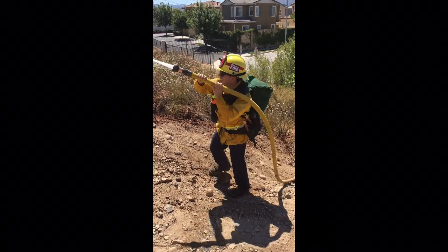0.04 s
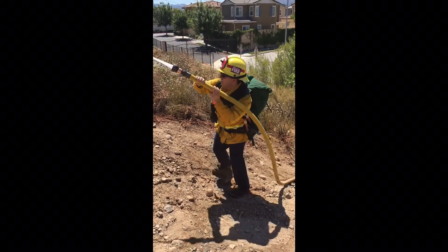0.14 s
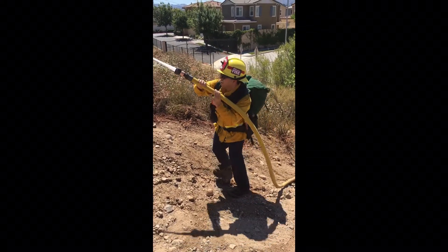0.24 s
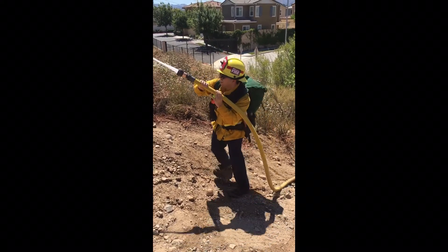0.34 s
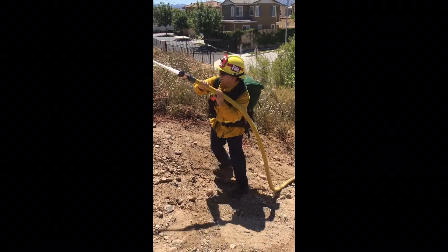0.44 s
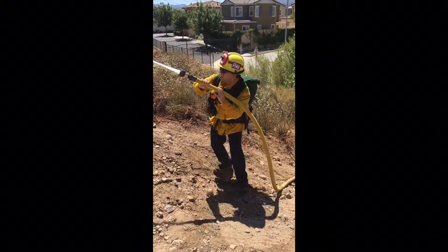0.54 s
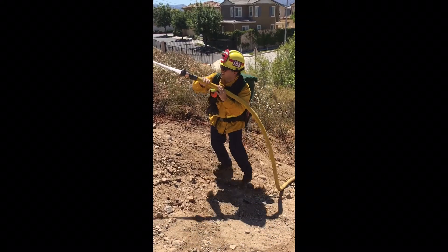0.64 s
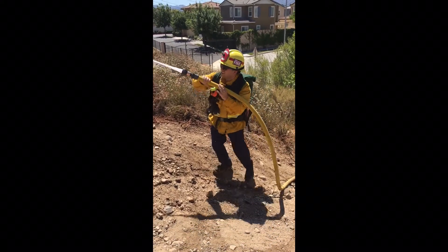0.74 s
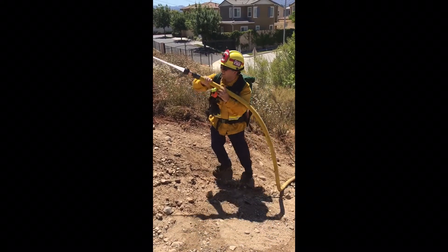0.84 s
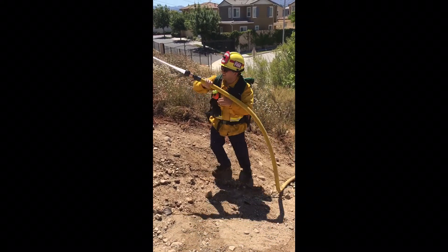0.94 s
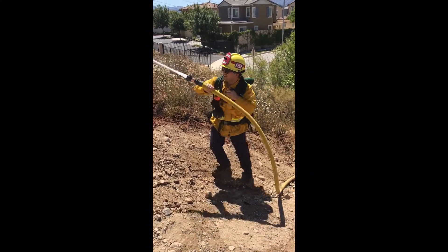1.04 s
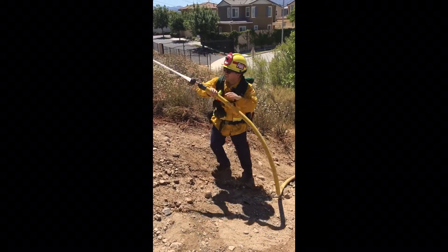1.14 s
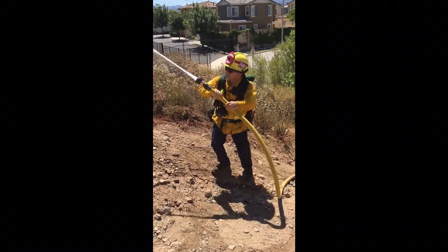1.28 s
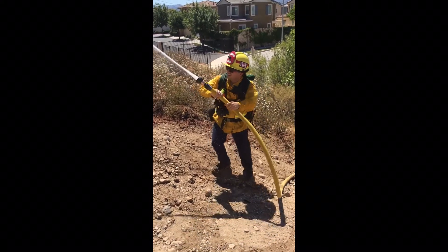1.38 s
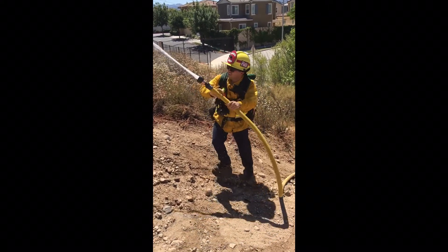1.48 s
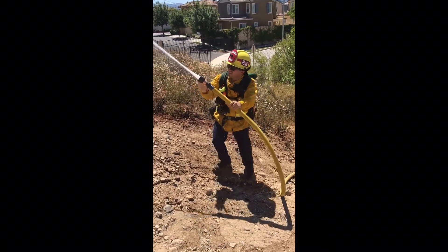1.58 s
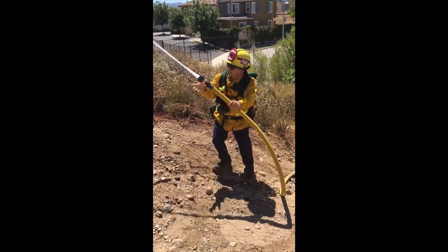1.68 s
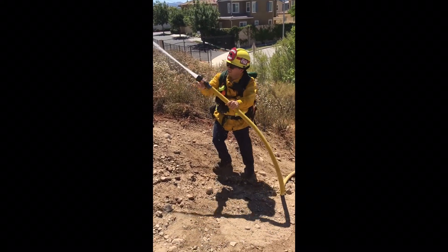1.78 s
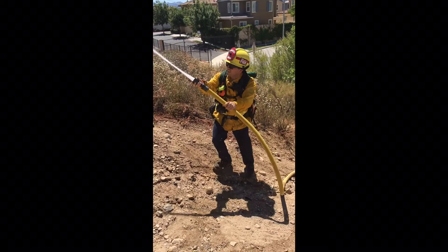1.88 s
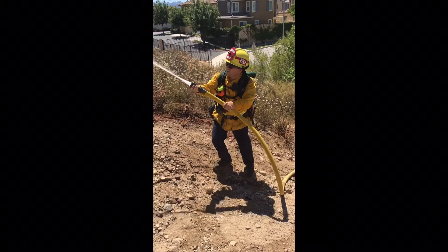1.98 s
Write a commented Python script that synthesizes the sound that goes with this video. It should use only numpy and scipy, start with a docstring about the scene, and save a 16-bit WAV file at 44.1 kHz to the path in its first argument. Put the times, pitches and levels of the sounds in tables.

```python
"""A hose nozzle sprays over a dry slope: shaped noise rushes and hisses, random drops spatter in it, and the
level heard dips briefly after the clink. Low noise makes a little wind rumble; bright noise bursts tick as gear.
A metal fitting clinks once and bounces twice: noise cracks over a bright ring of beating sines, with echoes
and faint later tinkles. Soft low thumps come next, and a boot scuffs and lands on stony dirt with short
sine knocks and noise grit. The sound is mono, alike in both channels."""
import sys
import numpy as np
from scipy import signal
from scipy.fft import rfft, irfft
from scipy.io import wavfile
from scipy.ndimage import map_coordinates

SR = 44100
rng = np.random.default_rng(int(sys.argv[2]) if len(sys.argv) > 2 else 0)


def log_audio(samples):
    """Write samples as a 16-bit WAV file to the path given in sys.argv[1]."""
    # one column per channel
    frames = np.atleast_2d(samples).T
    # limit to full scale, then quantise
    limited = np.clip(frames, -1, 1)
    pcm = np.round(limited * 32767).astype(np.int16)
    wavfile.write(sys.argv[1], SR, pcm)


N = 88200  # 2 s
T = np.arange(N) / SR
HZ = np.maximum(np.arange(N // 2 + 1) * SR / N, 1)


def from_db(db):
    """Decibels to gain."""
    return 10 ** (np.asarray(db) / 20)


def rms_one(x):
    """Scale to rms 1."""
    return x / np.sqrt(np.mean(x ** 2) + 1e-20)


def colour(x, spectrum, peaks=()):
    """Filter by a spectrum with resonances on top, rolling off below its lowest point; rms 1."""
    hz, db = np.transpose(spectrum)
    curve = np.interp(np.log(HZ), np.log(hz), db)
    for centre_hz, width_hz, lift_db in peaks:
        curve = curve + lift_db / (1 + (2 * (HZ - centre_hz) / width_hz) ** 2)
    low_cut = HZ ** 2 / (HZ ** 2 + (hz[0] / 2) ** 2)
    return rms_one(irfft(rfft(x) * from_db(curve) * low_cut, N))


def noise(spectrum, peaks=()):
    """Coloured noise of rms 1."""
    return colour(rng.standard_normal(N), spectrum, peaks)


def drift(rate_hz):
    """Slow random wander of rms 1: noise that falls away above the rate."""
    return rms_one(irfft(rfft(rng.standard_normal(N)) / (1 + (HZ / rate_hz) ** 2), N))


def decay(start_s, t60_s):
    """A sudden start that dies away by 60 dB in t60."""
    return (T >= start_s) * from_db(-60 * np.clip((T - start_s) / t60_s, 0, 2))


def spray():
    """The jet rushes through resonances, its mist hisses, and drops patter within the hiss."""
    # level of the spray as heard, dipping briefly after the clink: start_s, rush_level_db, hiss_level_db
    heard_levels = [(0, -39.5, -44.5), (.18, -40.5, -43.3), (.33, -44, -46.5), (.39, -43.5, -47.5),
                    (.45, -40.5, -43.5), (.62, -42.5, -44.5), (.8, -42, -44.5), (1.05, -43, -46),
                    (1.32, -42, -45), (1.6, -42.5, -44.6), (2, -43, -44.5)]
    # rush of the jet: freq_hz, level_db (per Hz, relative)
    rush_spectrum = [(130, -3.5), (250, 1), (430, -8.5), (650, -0.5), (900, -4.5), (1400, -1.5),
                     (2800, -4.5), (3400, -7), (4200, -6), (5000, -13.5), (8000, -21.5)]
    # resonances that colour the rush: freq_hz, width_hz, lift_db
    rush_peaks = [(1048, 99, 5.5), (1134, 42, 3.5), (1211, 76, 6.5), (1664, 39, 8), (1878, 52, 7),
                  (2307, 120, 6), (2485, 72, 5.5), (2820, 64, 3.5), (2990, 110, 7.5), (3510, 40, 6.5)]
    # hiss of the mist: freq_hz, level_db (per Hz, relative)
    hiss_spectrum = [(3000, -19), (5200, -5), (6400, 2), (7050, 1), (7900, -4), (8500, -2.5), (9100, 1),
                     (9900, 2), (10300, -4), (11000, -1.5), (12000, -5), (13200, -3.5), (15500, -5.5)]
    drops_per_s, drop_spread_db = 1500, 7
    drops_db = -13  # relative to the hiss

    s, rush_db, hiss_db = np.transpose(heard_levels)
    rush_level = from_db(np.interp(T, s, rush_db) + .5 * drift(rate_hz=18))
    rush = noise(rush_spectrum, rush_peaks) * rush_level

    # most drops are small, a few much larger, pushing either way
    sizes = from_db(drop_spread_db * np.minimum(rng.exponential(1, N), 5))
    signed_sizes = sizes * rng.choice([-1, 1], N)
    falls = rng.random(N) < drops_per_s / SR
    drops = colour(signed_sizes * falls, hiss_spectrum)

    hiss = noise(hiss_spectrum) + from_db(drops_db) * drops
    hiss_level = from_db(np.interp(T, s, hiss_db) + 0.17 * drift(rate_hz=25))
    return rush + hiss * hiss_level


def patchy(x, count=44):
    """Narrow overlapping bands swell and fade on their own, so the colour wanders."""
    wander_db, wander_hz = 1.12, 6.2
    centres = np.log(np.geomspace(400, 16000, count))
    whole = rfft(x)
    total = 0
    for band in np.eye(count):
        weight = np.interp(np.log(HZ), centres, band)
        total = total + irfft(whole * weight, N) * from_db(wander_db * drift(wander_hz))
    return total


def over_ground(x):
    """The ground reflects the spray, with a delay that wanders as the nozzle sways."""
    lag_s, sway_s, reflection_db = .0045, 0.00013, -18.5
    lag = lag_s + sway_s * drift(rate_hz=1.4)
    reflection = map_coordinates(x, [(T - lag) * SR], order=3, mode="wrap")
    return x + from_db(reflection_db) * reflection


def wind():
    """Low noise whose level wanders: a slightly lumpy rumble."""
    # wind rumble: freq_hz, level_db (per Hz, relative)
    wind_spectrum = [(15, -26), (30, -9), (55, 2), (85, 2.5), (120, -3), (200, -16.5), (400, -32)]
    return noise(wind_spectrum) * from_db(-50.5 + 0.63 * drift(rate_hz=6))


def ticks():
    """Gear and grit tick: bright noise with a sudden start and a very short decay."""
    # small ticks: start_s, level_db
    tick_times = [(0.131, -39), (0.1325, -30.5), (.3790, -35.5), (0.4503, -36), (0.611, -34.5)]
    # colour of a tick: freq_hz, level_db (per Hz, relative)
    tick_spectrum = [(1500, -10), (4000, -1), (7000, -6), (10000, 6), (16000, -8)]
    return noise(tick_spectrum) * sum(from_db(db) * decay(s, t60_s=0.011) for s, db in tick_times)


def partial(start_s, hz, t60_s, swell_s, beats_per_s):
    """One mode of the metal: it swells, beats and dies away."""
    beat_depth = .45
    age = np.maximum(T - start_s, 0)
    swelling = 1 - np.exp(-2 * age / swell_s)
    beating = 1 - beat_depth * np.sin(np.pi * beats_per_s * age) ** 2
    return decay(start_s, t60_s) * swelling * beating * np.sin(2 * np.pi * hz * age)


def fitting():
    """The blow sets metal modes ringing, each contact cracks; ground and hillside send some back."""
    # cracks of the blow and its two bounces: start_s, level_db
    contacts = [(0.2021, -16.5), (0.2068, -21), (0.2107, -24)]
    # modes of the fitting: pitch_hz, level_db (before swell and beats), t60_s, swell_s (to 86 %), beats_per_s
    modes = [(1520, -32, .06, .002, 5), (3017, -31, .08, .002, 5), (3950, -19, .028, .001, 5),
             (4292, -20, .04, .001, 12), (4363, -28, .25, .012, 18), (6034, -11, .1, .08, 1),
             (8503, -23, .06, .001, 12), (8587, -19, .125, .002, 32), (8799, -15, .055, .002, 28),
             (8914, -13, .11, .03, 3), (12259, -23, .15, .025, 32), (12949, -17, .06, .001, 6),
             (13112, -5.5, .062, .001, 4), (13125, -20, .16, .002, 28), (13324, -23, .05, .001, 6),
             (15386, -18, .05, .006, 5), (15442, -4, .055, .018, 5)]
    # colour of each contact: freq_hz, level_db (per Hz, relative)
    crack_spectrum = [(900, -20), (1500, -2), (2600, -8), (4100, 0), (5200, -2.5), (6500, 0.5),
                      (7600, -5.5), (9000, 3.5), (11000, -4), (13000, -11), (14300, -14), (16000, -9)]
    struck_s, crack_t60_s = .2022, 0.021
    echo_db, echo_delay_s, echo_t60_s = -17.5, .017, 0.12  # diffuse return from the ground
    slap_db, slap_s = -20.5, .068  # faint, duller echo from the hillside

    ring = sum(from_db(db) * partial(struck_s, hz, t60, swell, beats) for hz, db, t60, swell, beats in modes)
    crack = noise(crack_spectrum) * sum(from_db(db) * decay(s, crack_t60_s) for s, db in contacts)
    high_pass = signal.butter(2, 1200, "high", fs=SR, output="sos")
    hit = signal.sosfilt(high_pass, ring + crack)

    # a decaying noise tail of unit energy
    tail = rms_one(rng.standard_normal(N) * decay(echo_delay_s, echo_t60_s)) / np.sqrt(N)
    echo = signal.fftconvolve(hit, tail)[:N]
    low_pass = signal.butter(4, 8500, fs=SR, output="sos")
    slap = signal.sosfilt(low_pass, np.roll(hit, int(slap_s * SR)))
    return hit + from_db(echo_db) * echo + from_db(slap_db) * slap


def tinkles():
    """Light touches wake single high modes as the fitting settles: decaying sines."""
    # faint touches: start_s, pitch_hz, level_db
    touches = [(.344, 13123, -44), (.453, 12259, -46), (.454, 15442, -45), (.472, 15442, -45)]
    return sum(from_db(db) * decay(s, t60_s=.08) * np.sin(2 * np.pi * hz * (T - s)) for s, hz, db in touches)


def thumps():
    """Soft contacts of boot and hose push a few low cycles under a half-sine swell."""
    # soft contacts: start_s, pitch_hz, level_db, length_s
    contacts = [(.3615, 68.5, -35.5, .028), (.571, 210, -40.5, 0.024), (.592, 58, -37.5, 0.025)]
    total = 0
    for s, hz, db, length in contacts:
        swell = np.sin(np.pi * np.clip((T - s) / length, 0, 1))
        total = total - from_db(db) * swell * np.sin(2 * np.pi * hz * (T - s))
    return total


def boot():
    """The sole scuffs dirt as smooth noise swells; stones knock as short modes and grit crunches as noise."""
    # boot on stones: start_s, knock_level_db, grit_level_db, grit_t60_s
    steps = [(.5967, -18, -33, .028), (.6227, -23, -33, .022)]
    # what the stones ring with: pitch_hz, level_db (relative to the knock), t60_s
    stone_modes = [(700, -14, .005), (1300, -8, .005), (2300, -10, .005), (2850, -11, .007)]
    # grit under the sole: freq_hz, level_db (per Hz, relative)
    grit_spectrum = [(380, -12), (600, -8), (1250, 1), (1800, -2.5), (2600, 1), (3500, -16.5), (8000, -15),
                     (15000, -30)]
    # sole scuffing the dirt: centre_s, half_length_s (to 1/e), level_db
    scuffs = [(0.599, 0.024, -38), (0.627, 0.012, -47.5)]

    knocks = sum(from_db(db + mode_db) * decay(s, t60) * np.sin(2 * np.pi * hz * (T - s))
                 for s, db, _, _ in steps for hz, mode_db, t60 in stone_modes)
    crunch = sum(from_db(db) * decay(s, t60) for s, _, db, t60 in steps)
    scuff = sum(from_db(db) * np.exp(-((T - s) / length) ** 2) for s, length, db in scuffs)
    return knocks + noise(grit_spectrum) * (crunch + scuff)


def scene():
    """Everything reaches one microphone, alike in both channels."""
    water = over_ground(patchy(spray()))
    metal = fitting() + tinkles()
    mono = water + wind() + ticks() + metal + thumps() + boot()
    return np.tile(mono, (2, 1))


def record(dry):
    """A steep low-pass cuts the top."""
    cutoff_hz = 15850
    low_pass = signal.ellip(12, .1, 90, cutoff_hz, fs=SR, output="sos")
    return signal.sosfilt(low_pass, dry)


dry = scene()
out = record(dry)
log_audio(out)
```